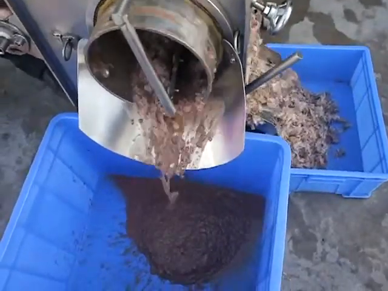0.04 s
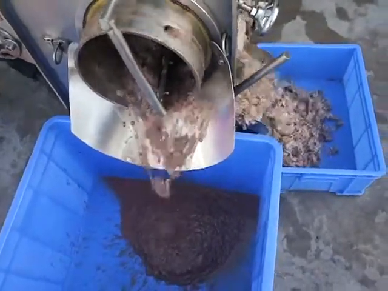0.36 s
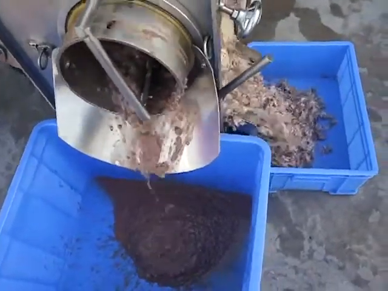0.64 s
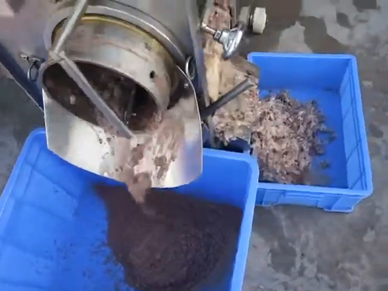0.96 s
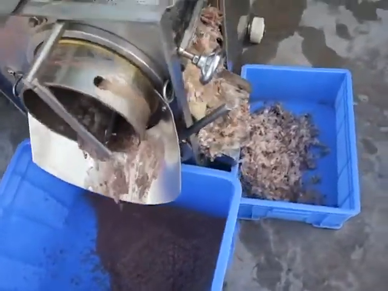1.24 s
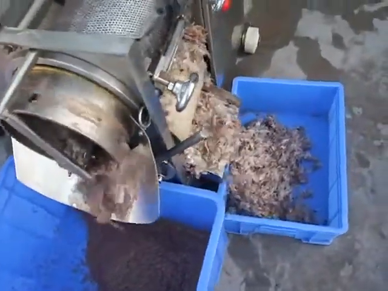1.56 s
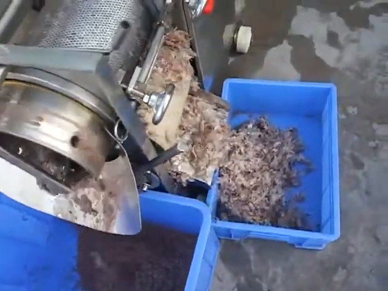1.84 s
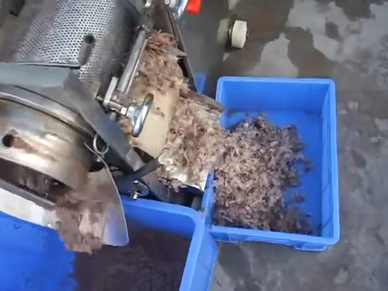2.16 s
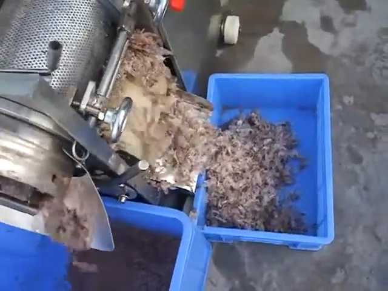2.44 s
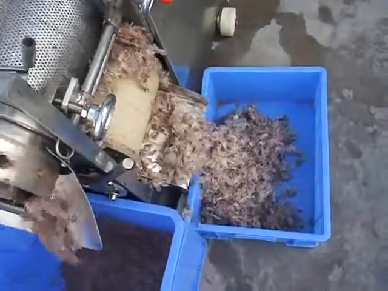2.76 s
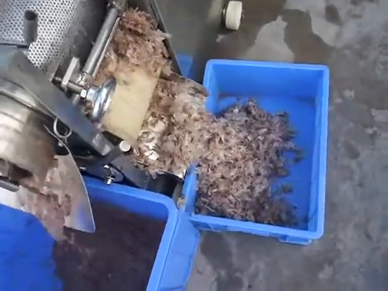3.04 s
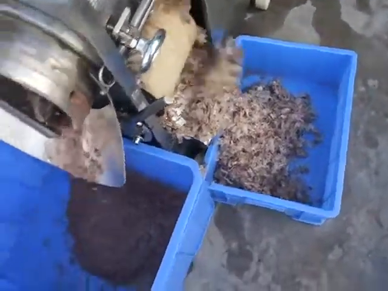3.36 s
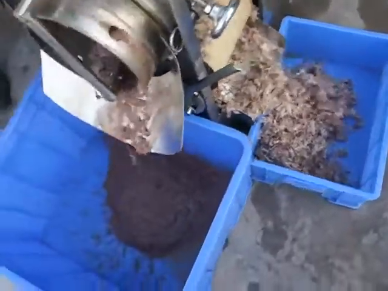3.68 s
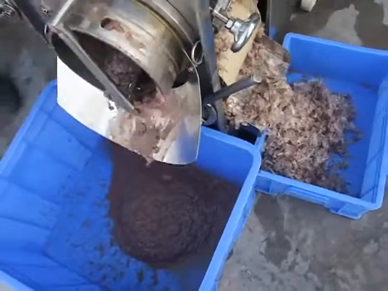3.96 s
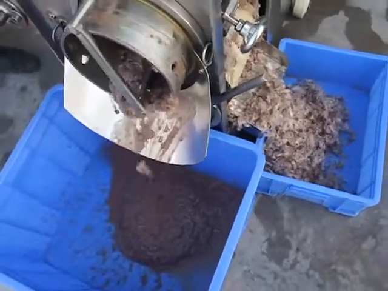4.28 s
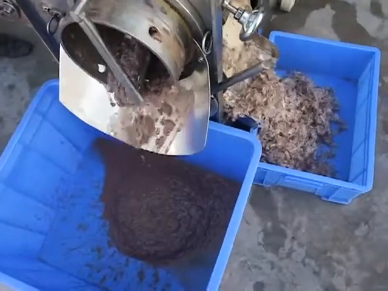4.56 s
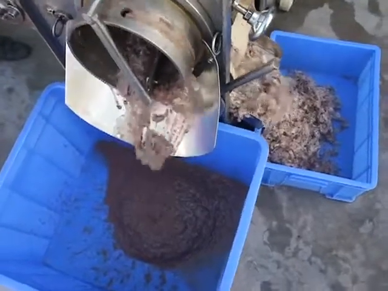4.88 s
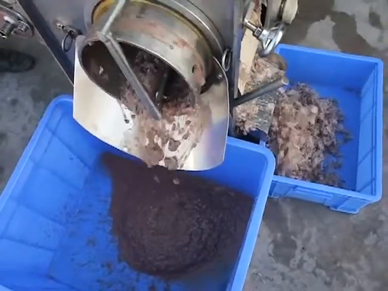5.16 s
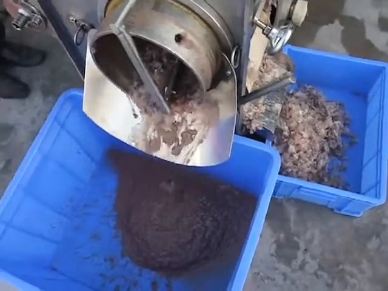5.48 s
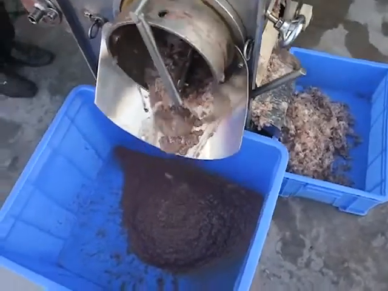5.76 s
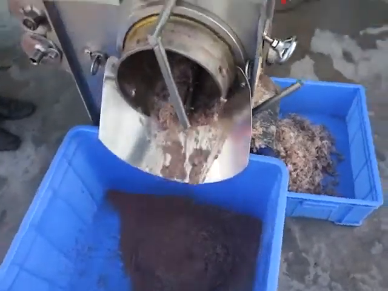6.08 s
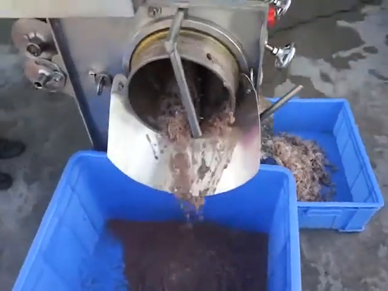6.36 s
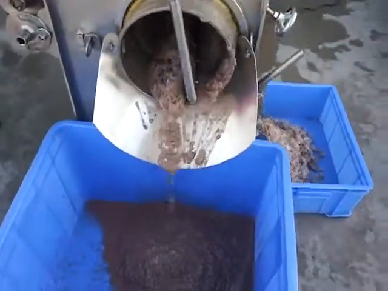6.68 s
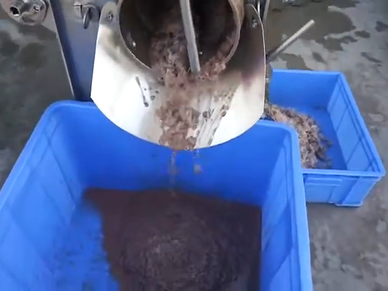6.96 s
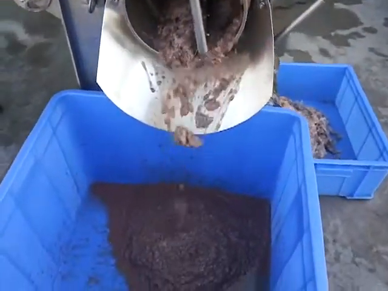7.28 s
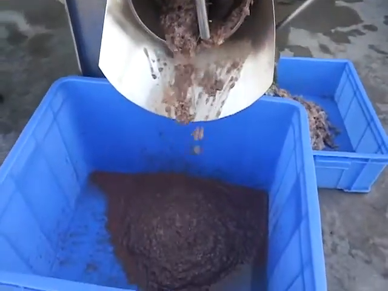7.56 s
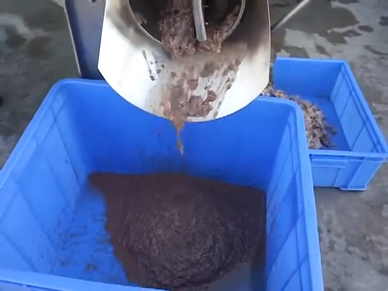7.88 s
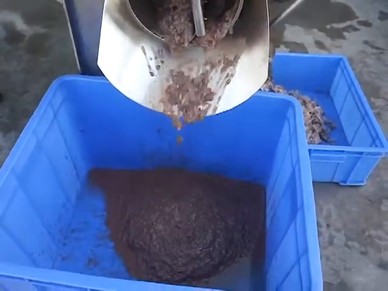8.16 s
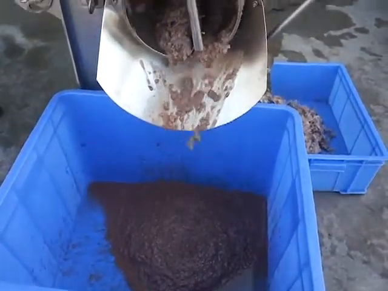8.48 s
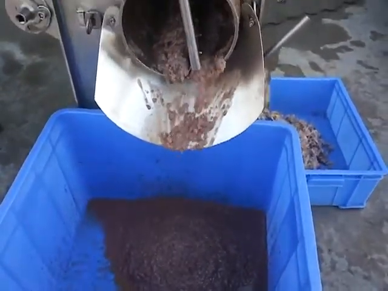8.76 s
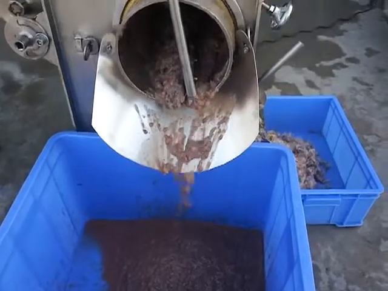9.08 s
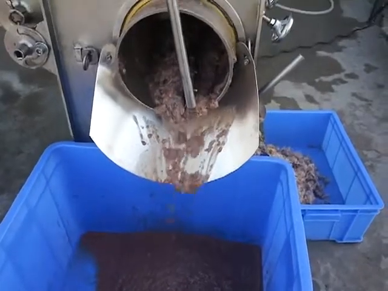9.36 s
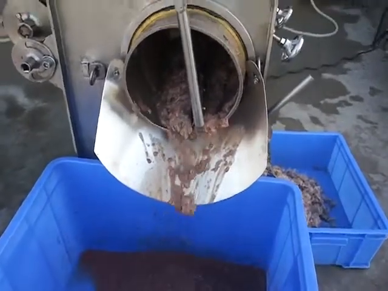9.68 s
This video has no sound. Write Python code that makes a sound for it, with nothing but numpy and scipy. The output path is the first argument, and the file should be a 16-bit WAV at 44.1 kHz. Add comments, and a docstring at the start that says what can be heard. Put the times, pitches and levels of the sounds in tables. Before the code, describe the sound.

Heard close up in a workshop, a pulp grinding machine keeps up a steady, slightly throbbing steel drone. Short wet spurts break through at uneven intervals over a soft rubbing hiss. Several dull, hollow knocks come near the start, then the motor's whine swells and wavers as the microphone moves around the machine. Occasional brief squeaks occur, and a few sharp bubble pops dot the second half.

```python
"""A steel drone and wet squelches, heard from close above a screw separator grinding pulp in a workshop.
Grinding drives the resonances of frame, drum, outlet and casing, over cooling air and room rumble.
The motor's whine grows and wavers as the listener leans round the machine through its standing waves.
Pulp rubs along a ringing screen, spurts air and juice, and now and then squeaks or snaps a bubble.
Early on, a few dull knocks sound."""
import sys
import numpy as np
from scipy import signal
from scipy.fft import rfft, irfft, next_fast_len
from scipy.io import wavfile
from scipy.ndimage import uniform_filter1d, map_coordinates

SR = 44100
rng = np.random.default_rng(int(sys.argv[2]) if len(sys.argv) > 2 else 0)


def wav_out(sig):
    """Save sig, one row per channel (or a flat mono array), as 16-bit PCM at SR to the path in sys.argv[1]."""
    wavfile.write(sys.argv[1], SR, np.round(np.clip(np.atleast_2d(sig).T, -1, 1) * 32767).astype(np.int16))


N = 429093
TIME = np.arange(N) / SR
FFT_SIZE = next_fast_len(N, real=True)
HZ = np.fft.rfftfreq(FFT_SIZE, 1 / SR)
SHAFT_HZ = 24.65

# lean towards the pulp outlet and nearness to the motor side: time_s, lean_0_to_1, near_0_to_1
LISTENER_PATH = [(0, 0, .25), (1.1, 0.15, 0), (2.4, 0.92, 0.1), (3.3, 0.8, 0.1), (4.2, 0.2, 0),
                 (5.5, 0.04, 0.37), (6.2, 0, 0.81), (6.8, 0.16, 1), (7.5, 0.56, 0.6), (8.3, 0.06, 0.72),
                 (9.73, 0.15, 0.93)]
# likeness of the two channels: frequency_hz, correlation
STEREO_CORRELATION = [(30, -.3), (60, .05), (100, .33), (135, .65), (210, .74), (300, .6), (430, .78),
                      (650, .85), (1200, .86), (1820, .7), (3000, .44), (4800, .26), (8000, .13),
                      (12000, .12)]
# balance of the two channels: frequency_hz, left_minus_right_db
STEREO_BALANCE = [(50, 1), (200, -1.4), (700, -2), (1300, -3), (2500, -2.5), (4000, -1), (7000, 0.5),
                  (12000, -1.5)]
# spectrum of the room rumble: frequency_hz, gain_db
ROOM_SPECTRUM = [(20, -32), (32, -27), (45, -19), (72, 1), (90, 4.5), (130, 6.5), (250, -8.5), (500, -2.5),
                 (1000, -15), (3000, -32.5)]
# strength of the room rumble: time_s, level_db
ROOM_LEVEL = [(0, -30), (2.3, -30.5), (3.5, -37), (5.6, -42), (6.3, -34.5), (8.2, -34), (9.73, -37)]
# spectrum of the cooling air: frequency_hz, gain_db
AIR_SPECTRUM = [(600, -45), (880, -11), (935, -2), (1005, -15), (1060, 3), (1115, 2), (1175, 1), (1255, 3),
                (1370, -7.5), (1550, -8.5), (1780, -8.5), (1950, -31), (2280, -15.5), (2600, -14.5),
                (3100, -48)]
# thin motor and gear tones: pitch_hz, waver_hz, level_db, loudest_at_s, fade_db_per_s
GEAR_TONES = [(126.8, 1.58, -30, 8.9, 2.5), (236.9, 1.95, -29.5, 7.2, 1.6), (586.5, 6.02, -35.5, 6.4, 3),
              (795, 3.9, -38.5, 7.3, 1.5), (1127, 7.1, -39, 9.4, 0.3), (1210, 4.8, -36, 10.5, 1.5),
              (1248, 7.13, -37, 8.6, 1.5), (1475, 4, -43, 2.6, 0.2), (1683, 5.49, -45, 8, 1),
              (1710, 4.1, -43.5, 6.2, 1.5), (1780, 2.84, -44, 7.7, 1.2)]
# motor frame resonances: centre_hz, width_hz, gain_db
FRAME_MODES = [(107, 13, -9), (126.2, 5.6, 5), (138.7, 9.9, 4.5), (343.4, 23, 0.5), (400, 26, -7),
               (561, 41, -3)]
# moments of harder frame vibration: start_s, length_s, change_db
FRAME_SHAKES = [(5.9, 0.49, 2), (7.42, 0.14, 5), (8.65, 0.25, 3.5), (9.2, 0.46, 2)]
# outlet resonances: centre_hz, width_hz, gain_db
OUTLET_MODES = [(415, 32, 3.5), (459, 34, 2)]
# casing resonances: centre_hz, width_hz, gain_db, motor_side_extra_db
CASING_MODES = [(288.5, 41, 1.5, -1), (352, 56, -4.5, 2.5), (410, 68, -7, 3.5), (528, 41, -3, -0.5),
                (611.5, 41, -3.5, 4), (679, 60, -6, 2.5), (768, 68, -5, 4), (864, 62, -2, 1),
                (975, 80, -6.5, -6)]
# drum resonances: centre_hz, width_hz, gain_db
DRUM_MODES = [(170, 23, -9), (187, 9.4, -5), (198.5, 5, -6.5), (204.6, 6.1, 1.5), (237.8, 3.3, -9.5),
              (229, 63, -10.5)]
# swells and dips in the drum's drone; the long dip is the sound ducking around the knocks:
# start_s, length_s, change_db
DRUM_SWELLS = [(.16, 0.055, 7), (.37, 0.11, -7), (.473, 0.077, 7), (.663, .22, 2.5), (1.02, 0.55, -3.5),
               (1.57, 0.21, 4), (1.82, 0.16, -2), (2.15, .09, -4), (2.6, 0.048, 6), (3.23, .09, -6),
               (3.52, .19, 1), (4.2, .18, 1.5), (4.41, 0.064, 3), (4.53, 0.067, 2), (4.82, 0.064, 3.5),
               (5.03, 0.081, 5.5), (5.135, .06, -13), (5.2, 0.096, 2.5), (5.865, 0.084, 4),
               (6.39, 0.21, 2.5), (6.8, 0.1, 4), (7.04, 0.063, -4), (7.35, .075, -5), (7.7, .084, 3.5),
               (7.79, 0.076, -4), (7.93, .15, 2.5), (8.235, .06, -5), (8.42, 0.067, -7), (8.74, 0.07, 4.5),
               (8.89, 0.079, 5.5), (9.06, 0.13, 3), (9.24, 0.08, -2.5)]
# whine pitch, following motor speed under load: time_s, pitch_hz
WHINE_PITCH = [(0, 887), (1.6, 885.5), (3.05, 887), (3.45, 891), (4.2, 890), (4.85, 893), (5.3, 891),
               (5.8, 892.5), (8.9, 892.3), (9.73, 889)]
# whine strength along the path through the standing waves: time_s, level_db
WHINE_LEVEL = [(0, -45), (.9, -35.5), (1.5, -27.5), (1.88, -21.5), (2.06, -23.5), (2.55, -20.5),
               (2.85, -20.5), (3.08, -22.5), (3.22, -16), (3.5, -15.5), (4.3, -20), (4.9, -20.5),
               (5.25, -24), (5.8, -22.5), (6.55, -35.5), (7.1, -24), (7.55, -24.5), (7.85, -21.5),
               (8.35, -21.5), (8.5, -26), (9.73, -26.5)]
# side on which the whine is heard: time_s, left_minus_right_db
WHINE_BALANCE = [(0, -15), (2.4, -2), (3.2, 2.5), (3.8, -3), (4.3, -5), (5.6, -9.5), (7, -1.5), (9.73, -4)]
# dull blows: start_s, level_db, t60_s, favoured_hz
KNOCK_EVENTS = [(.788, -8.5, 0.081, 600), (1.106, -16, 0.16, 600), (1.165, -14, 0.1, 340),
                (1.198, -14.5, 0.37, 545), (1.224, -10.5, 0.1, 620), (1.332, -5, 0.11, 420),
                (1.352, -15, .07, 1000), (1.359, -9.5, 0.12, 557), (1.404, -14, 0.12, 1000),
                (1.428, -9, 0.047, 1000)]
# modes of the struck hollow body: pitch_hz, gain_db
HOLLOW_MODES = [(290, -14), (350, 2), (400, -16), (450, -9), (544, 2.5), (592, -4), (680, -6.5),
                (800, -8.5), (990, -5), (1130, -18), (1300, -25)]
# spectrum of pulp friction: frequency_hz, gain_db
RUB_SPECTRUM = [(700, -9.5), (1300, 4), (2000, 0.5), (2800, -3.5), (3500, -4.5), (4500, -11), (5600, -12),
                (7500, -19.5), (12000, -36)]
# spectrum of tiny bursting bubbles: frequency_hz, gain_db
FIZZ_SPECTRUM = [(2000, -16), (4000, 3), (5200, 0), (6500, -3), (7800, 1), (9000, 4.5), (10800, 4.5),
                 (11800, 1), (12600, -9)]
# steel screen resonances: centre_hz, width_hz, gain_db
SCREEN_MODES = [(1665, 45, -3), (1935, 77, 3.5), (2190, 54, -2.5), (2720, 110, 0.5), (2860, 60, -8),
                (3195, 43, 0), (3720, 100, -4), (4240, 90, -4), (4740, 90, -3.5)]
# sound of pulp passing the screen: time_s, level_db
PULP_FLOW = [(0, -31.5), (.24, -37), (.62, -30), (.85, -36.5), (1.35, -36), (1.8, -30), (3.0, -31.5),
             (3.5, -33.5), (4.7, -35), (6.15, -32), (6.9, -35.5), (9.2, -35), (9.73, -30.5)]
# wet squeaks and pops: start_s, pitch_hz, half_width_hz, level_db, length_s
SQUEAK_EVENTS = [(1.027, 2400, 400, -23, 0.0088), (1.043, 2650, 400, -31, .018),
                 (2.458, 3706, 500, -26.5, 0.0078), (3.025, 2080, 250, -24, .007),
                 (6.617, 2750, 600, -30, .01), (7.006, 2420, 600, -27.5, 0.0097),
                 (7.593, 1460, 109, -13.5, 0.0041), (7.81, 2650, 400, -33, 0.033),
                 (7.832, 2387, 400, -27, 0.019)]
# spectrum of spitting air and juice: frequency_hz, gain_db
SPIT_SPECTRUM = [(500, -43), (1400, 4), (2400, 1), (3300, 2), (4500, 4), (7000, 2.5), (10500, 4.5),
                 (12500, -2.5)]
# single bursting bubbles: start_s, level_db, brightest_hz, decay_s
SNAP_EVENTS = [(5.8415, -5.5, 7460, 0.00095), (5.851, -16.5, 10810, .001), (6.547, -16, 6000, 0.0011),
               (7.1867, -9, 3400, 0.0017), (7.196, -22, 9500, .001), (7.593, -10, 1900, 0.0025),
               (8.187, -10.5, 9500, 0.0011), (8.458, -9, 2940, 0.0039)]
# loud spurts of air and juice: start_s, level_db, treble_db, t60_s
SQUELCH_EVENTS = [(.101, -21.5, -18, 0.16), (.288, -24.5, -17, 0.11), (.495, -20.5, -21, 0.062),
                  (.66, -19, -17, 0.16), (1.025, -25, -20, .12), (1.16, -18, -13, 0.045),
                  (1.292, -25, -16, .06), (1.716, -18, -18.5, 0.17), (1.98, -15.5, -21, 0.047),
                  (2.05, -20.5, -19, 0.11), (2.254, -20, -19, 0.078), (2.457, -19, -18, .06),
                  (3.027, -17.5, -16, 0.088), (3.808, -22, -18, 0.078), (4.082, -13.5, -17, 0.09),
                  (4.365, -25.5, -12, 0.15), (4.543, -21.5, -9, 0.072), (4.602, -25, -13, .025),
                  (4.954, -22.5, -16, 0.11), (5.105, -24, -16, 0.22), (5.191, -17, -17, 0.085),
                  (5.23, -20, -22, 0.21), (5.374, -15, -21.5, 0.091), (5.565, -23, -9, .055),
                  (5.647, -20, -16, .12), (5.996, -22, -15, .1), (6.013, -16, -19, 0.1),
                  (6.102, -18, -18, 0.13), (6.176, -12.5, -9, 0.048), (6.546, -18.5, -6, 0.056),
                  (6.566, -19, -14, 0.1), (6.654, -24, -9, 0.041), (7.349, -17.5, -11.5, 0.04),
                  (7.41, -21, -11, 0.1), (7.836, -20.5, -7, 0.048), (8.076, -24.5, -19, 0.22),
                  (8.118, -22, -21, 0.037), (8.182, -23, -7, 0.055), (8.277, -24, -6, .07),
                  (8.298, -24, -12, 0.079), (8.5, -22.5, -19.5, 0.28), (8.565, -14.5, -11, 0.06),
                  (8.757, -21.5, -19, .12), (8.772, -19.5, -21, .12), (8.861, -20.5, -21, .13),
                  (9.002, -23.5, -20, 0.12), (9.059, -26, -20, .09), (9.135, -17.5, -18, 0.17),
                  (9.387, -29, -11, .09), (9.414, -20, -19, 0.11), (9.56, -35, -16, .15),
                  (9.609, -28, -21, 0.082), (9.658, -21, -15, 0.11)]


def gain_of(db):
    """Amplitude grows tenfold for every 20 dB."""
    return 10 ** (np.asarray(db) / 20)


def unit_rms(x):
    """Normalises a signal to unit mean power."""
    return x / np.sqrt(np.mean(x ** 2) + 1e-20)


def at_hz(points, hz=HZ):
    """Interpolates a table on a logarithmic frequency axis."""
    frequency, value = np.transpose(points)
    return np.interp(np.log(hz + 1), np.log(frequency + 1), value)


def curves(rows):
    """Interpolates each column of a time table linearly, sample by sample."""
    time_s, *columns = np.transpose(rows)
    return [np.interp(TIME, time_s, column) for column in columns]


def add(mix, start_s, sound):
    """Superposition: a stereo sound adds to the mix from its start time."""
    part = mix[:, max(round(start_s * SR), 0):][:, :sound.shape[1]]
    part += sound[:, :part.shape[1]]


def wander(rate_hz):
    """Random modulation of unit rms, with rate_hz new values a second."""
    points = rng.standard_normal(8192)
    return unit_rms(map_coordinates(points, [TIME * rate_hz], order=1, mode="wrap"))


def quiver(rate_hz):
    """High-passed random modulation: subtracting the running mean leaves the fast part."""
    drift = wander(rate_hz)
    return unit_rms(drift - uniform_filter1d(drift, size=SR // 8))


def swells(rows):
    """Level envelope in dB, with a half-elliptical rise or dip for each row."""
    return sum(change_db * np.sqrt(np.maximum(1 - (2 * (TIME - start_s) / length_s - 1) ** 2, 0))
               for start_s, length_s, change_db in rows)


def resonances(modes):
    """Magnitude response of steep-sided resonances whose powers add."""
    return np.sqrt(sum(gain_of(db) ** 2 / (1 + ((HZ - hz) / (0.73 * width_hz)) ** 2) ** 2
                       for hz, width_hz, db in modes))


def stereo(pair, response, left_lead_s=32e-6):
    """Partial coherence: two independent signals are filtered and blended as at two nearby points."""
    right, independent = rfft(pair, FFT_SIZE)
    correlation = at_hz(STEREO_CORRELATION)
    left = correlation * right + np.sqrt(1 - correlation ** 2) * independent
    left *= np.exp(2j * np.pi * HZ * left_lead_s) * gain_of(at_hz(STEREO_BALANCE))
    return unit_rms(irfft(np.array([left, right]) * response, FFT_SIZE)[:, :N])


def noise(response):
    """White noise takes on the spectrum of the filter it passes; stereo, unit rms."""
    return stereo(rng.standard_normal((2, N)), response)


def steadied(x, window_samples):
    """A steady drive: dividing by a running level evens out the chance swells of narrowband noise."""
    power = uniform_filter1d((x ** 2).mean(0), size=window_samples)
    return unit_rms(x / (power + 1e-9) ** 0.43)


def reflection_ripple(depth=0.24, count=24):
    """Interference: reflections from steel and floor, 5 to 25 ms late, ripple the spectrum."""
    taps = np.zeros(FFT_SIZE)
    taps[rng.integers(SR // 200, SR // 40, count)] = rng.choice([-1, 1], count)
    return np.abs(1 + depth * unit_rms(rfft(taps).real))


def shaft_judder(depth=0.13, flutter_db=1.64):
    """Amplitude modulation: one throb per shaft turn, roughened by random flutter."""
    return (1 + depth * np.sin(2 * np.pi * SHAFT_HZ * TIME)) * gain_of(flutter_db * quiver(50))


def room_rumble():
    """Ambient noise with its energy concentrated at low frequencies."""
    return noise(gain_of(at_hz(ROOM_SPECTRUM))) * gain_of(curves(ROOM_LEVEL)[0])


def cooling_air(lean, near, level_db=-32):
    """Rushing air radiates broadband noise, loudest on the motor side."""
    return noise(gain_of(at_hz(AIR_SPECTRUM))) * gain_of(level_db + 5 * near + lean)


def gear_tones(flicker_db=2.2):
    """Periodic motion radiates thin, wavering tones, each loudest at one point of the listener's path."""
    out = np.zeros((2, N))
    for hz, waver_hz, db, loudest_at_s, fade_db_per_s in GEAR_TONES:
        cycles = hz * TIME + np.cumsum(waver_hz * wander(18)) / SR
        level = gain_of(db - fade_db_per_s * abs(TIME - loudest_at_s) + flicker_db * wander(7))
        channel_phase = 0.064 * rng.random((2, 1))
        out += np.sqrt(2) * level * np.sin(2 * np.pi * (cycles + channel_phase))
    return out * gain_of([[-1], [1]])


def frame_hum(near, level_db=-34.5, near_db=9):
    """Forced vibration of the motor frame's low modes, louder close to the motor."""
    hum = steadied(noise(resonances(FRAME_MODES)), window_samples=6000)
    return hum * gain_of(level_db + near_db * near - 0.3 * wander(4.7) + swells(FRAME_SHAKES))


def outlet_groan(lean, level_db=-32, lean_db=7):
    """Grinding excites two resonances of the outlet, louder as the listener leans towards it."""
    groan = steadied(noise(resonances(OUTLET_MODES)), window_samples=9000)
    return groan * gain_of(level_db + lean_db * lean)


def casing_churn(near, level_db=-25.5, near_db=2):
    """Directional radiation: the balance of the casing's modes shifts towards the motor side."""
    far = noise(resonances([(hz, width, db) for hz, width, db, _ in CASING_MODES]))
    close = noise(resonances([(hz, width, db + extra_db) for hz, width, db, extra_db in CASING_MODES]))
    blend = far * np.sqrt(1 - near) + close * np.sqrt(near)
    return steadied(blend, window_samples=9000) * gain_of(level_db + near_db * near)


def drum_drone(lean, level_db=-22.5):
    """Forced vibration: grinding drives the steel drum's modes, and their level swells and dips."""
    drone = steadied(noise(resonances(DRUM_MODES)), window_samples=3000)
    swell_db = 0.3 * wander(14) + swells(DRUM_SWELLS)
    return drone * gain_of(level_db - 0.5 * lean + swell_db)


def motor_whine(sideband_db=-20, flutter_db=0.95, left_lead_s=40e-6):
    """A tone and a sideband one shaft rate below; standing waves make their level depend on position."""
    (hz,), (db,), (balance_db,) = curves(WHINE_PITCH), curves(WHINE_LEVEL), curves(WHINE_BALANCE)
    cycles = np.cumsum(hz + 0.5 * wander(24.96)) / SR + hz * np.array([[left_lead_s], [0]])
    tone = np.sin(2 * np.pi * cycles)
    sideband = gain_of(sideband_db) * np.sin(2 * np.pi * (cycles - SHAFT_HZ * TIME))
    level = gain_of(db + flutter_db * quiver(36) + np.array([balance_db, -balance_db]) / 2)
    return np.sqrt(2) * (tone + sideband) * level


def knocks(focus_db_per_octave=9, rise_s=0.00083, left_db=-1):
    """Damped free vibration of a hollow body; each blow favours the modes near one frequency."""
    out, t = np.zeros((2, N)), np.arange(12000) / SR
    hz, mode_db = np.transpose(HOLLOW_MODES)[:, :, None]
    for start_s, db, t60_s, favoured_hz in KNOCK_EVENTS:
        detune, phase = rng.standard_normal((2, len(hz), 1))
        strength = gain_of(mode_db - focus_db_per_octave * abs(np.log2(hz / favoured_hz)))
        cycles = hz * (1 + 0.0094 * detune) * t + 0.11 * phase
        ring = unit_rms((strength * np.sin(2 * np.pi * cycles)).sum(0))
        envelope = gain_of(db - 60 * t / t60_s) * (1 - np.exp(-t / rise_s))
        add(out, start_s, gain_of([[left_db], [0]]) * ring * envelope)
    return out


def bubble_crackle(bursts_per_s=700, spread_db=3, decay_s=0.0024):
    """Shot noise: tiny bubbles burst at random, each a decaying puff, and their powers add."""
    onsets = rng.random(N) < bursts_per_s / SR
    bursts = onsets * gain_of(spread_db * np.minimum(rng.exponential(1, N), 4.5))
    puff = rng.standard_normal((2, 800)) * np.exp(-np.arange(800) / SR / decay_s)
    power = np.abs(signal.oaconvolve(bursts[None] ** 2, puff ** 2, axes=1)[:, :N])
    return unit_rms(np.sqrt(power) * rng.standard_normal((2, N)))


def pulp_on_screen(lean, rub_db=2, fizz_db=-7.5, ring_db=-11, lean_db=6):
    """Friction of wet pulp rings the screen, clearest near the outlet, while bubbles fizz in clumps."""
    clumps_db = quiver(60)
    drive = 0.49 * bubble_crackle() + rng.standard_normal((2, N))
    ripple = reflection_ripple()
    rubbing = stereo(drive, gain_of(at_hz(RUB_SPECTRUM)) * ripple) * gain_of(rub_db + clumps_db)
    fizzing = stereo(drive, gain_of(at_hz(FIZZ_SPECTRUM)) * ripple) * gain_of(fizz_db + 2 * clumps_db)
    ringing = noise(resonances(SCREEN_MODES)) * gain_of(ring_db + lean_db * lean + clumps_db)
    return (rubbing + fizzing + ringing) * gain_of(curves(PULP_FLOW)[0])


def squeaks(stereo_width=0.5):
    """Air forced through a wet gap resonates briefly; a narrow band of noise gives a rough pitch."""
    out, t, hz = np.zeros((2, N)), np.arange(4096) / SR, np.fft.rfftfreq(4096, 1 / SR)
    for start_s, pitch_hz, half_width_hz, db, length_s in SQUEAK_EVENTS:
        age = 3 * t / length_s
        swell = age * np.exp(1 - age)
        band = 1 / (1 + ((hz - pitch_hz) / half_width_hz) ** 4)
        rough = irfft(rfft(rng.standard_normal((2, len(t)))) * band)
        mid, side = (unit_rms(x * swell) * np.sqrt(np.mean(swell ** 2)) for x in rough)
        add(out, start_s, gain_of(db) * np.array([mid + stereo_width * side, mid - stereo_width * side]))
    return out


def bubble_snaps(level_db=-3, body_db=-6.5, echo_db=-23, echo_decay_s=0.02):
    """A bursting bubble gives a broadband impulse with a spectral peak and a brief echo in the spout."""
    out, t, hz = np.zeros((2, N)), np.arange(2048) / SR, np.fft.rfftfreq(2048, 1 / SR)
    for start_s, db, brightest_hz, decay_s in SNAP_EVENTS:
        peak = 1 / (1 + ((hz - brightest_hz) / 1000) ** 2)
        response = gain_of(at_hz(SPIT_SPECTRUM, hz)) * (gain_of(body_db) + peak)
        half_coherent = rng.standard_normal((2, len(t))) + rng.standard_normal(len(t))
        crack = unit_rms(irfft(rfft(half_coherent) * response))
        envelope = np.exp(-t / decay_s) + gain_of(echo_db) * np.exp(-t / echo_decay_s)
        add(out, start_s, gain_of(db + level_db) * crack * envelope)
    return out


def squelches(level_db=-2, grain_db=3, echo_db=-21, echo_t60_s=0.45, rise_share=0.01):
    """Spurting air and juice radiate grainy puffs of noise, which reverberate in the surrounding steel."""
    out, t, hz = np.zeros((2, N)), np.arange(8192) / SR, np.fft.rfftfreq(8192, 1 / SR)
    small_pockets = [(start_s, -35, -14, 0.021) for start_s in rng.random(30) * N / SR]
    tilt = 0.65 * np.clip(np.log2((hz + 1) / 5000), -1, 1)  # pivots about 5 kHz
    for start_s, db, treble_db, t60_s in list(SQUELCH_EVENTS) + small_pockets:
        response = gain_of(at_hz(SPIT_SPECTRUM, hz) + tilt * (treble_db + 10))
        grains = gain_of(grain_db * unit_rms(uniform_filter1d(rng.standard_normal(len(t)), size=70)))
        puff = unit_rms(irfft(rfft(rng.standard_normal((2, len(t))) * grains) * response))
        rise = 1 - np.exp(-t / (rise_share * t60_s))
        decay = gain_of(-60 * t / t60_s)
        echo = gain_of(echo_db - 60 * t / echo_t60_s) * (1 - t / t[-1])
        add(out, start_s, gain_of(db + level_db) * puff * rise * (decay + echo))
    return out


def scene():
    """Room, machine and pulp superpose at the moving listener; casing and air share one judder."""
    lean, near = curves(LISTENER_PATH)
    tones = motor_whine() + gear_tones()
    drone = frame_hum(near) + drum_drone(lean) + outlet_groan(lean)
    throbbing = shaft_judder() * (casing_churn(near) + cooling_air(lean, near))
    room = room_rumble()
    pulp = pulp_on_screen(lean) + squelches() + bubble_snaps() + squeaks()
    return room + tones + drone + throbbing + knocks() + pulp


def record(dry, low_hz=52, high_hz=12550, ceiling=0.88):
    """Band limiting removes deep bass and top treble; soft saturation rounds the highest peaks."""
    thinned = signal.sosfilt(signal.butter(2, low_hz, "highpass", fs=SR, output="sos"), dry)
    rounded = thinned / (1 + (thinned / ceiling) ** 8) ** (1 / 8)
    lowpass = signal.firwin(201, high_hz, window=("kaiser", 9), fs=SR)
    return signal.oaconvolve(rounded, lowpass[None], "same", axes=1)


dry = scene()
out = record(dry)
wav_out(out)
```